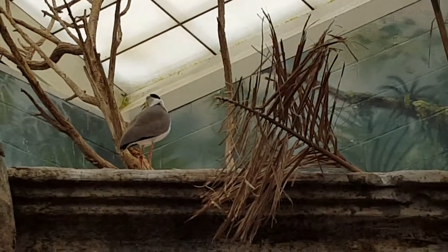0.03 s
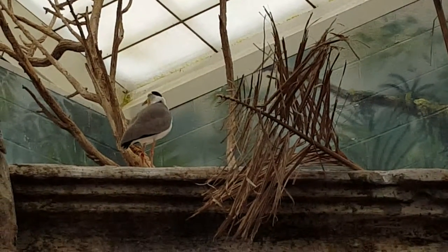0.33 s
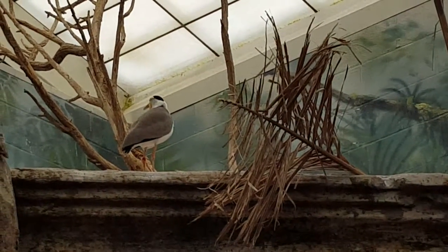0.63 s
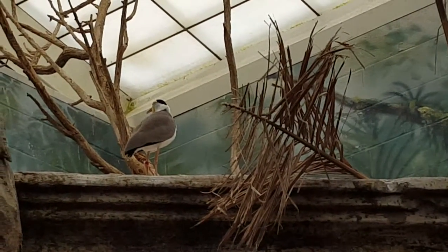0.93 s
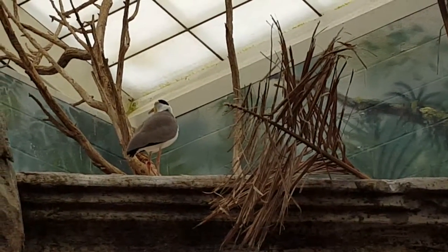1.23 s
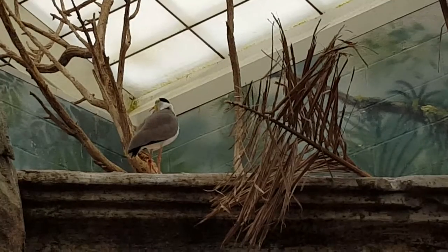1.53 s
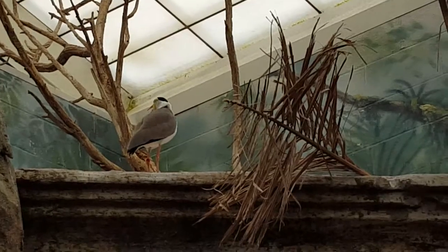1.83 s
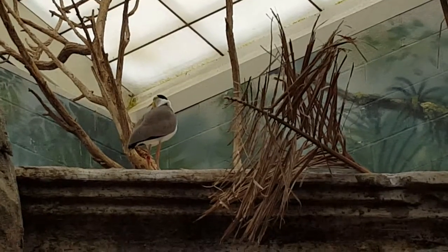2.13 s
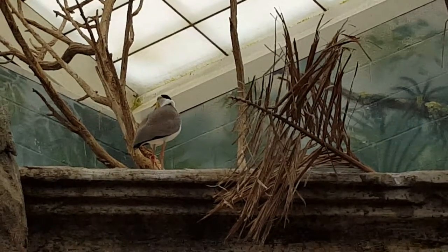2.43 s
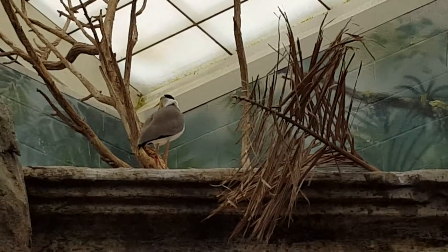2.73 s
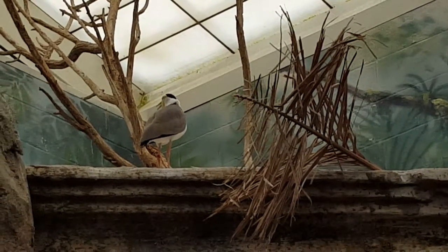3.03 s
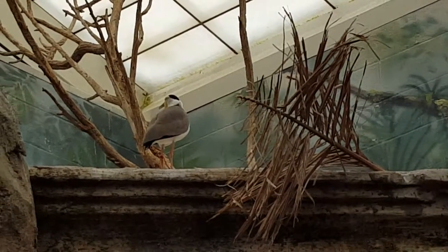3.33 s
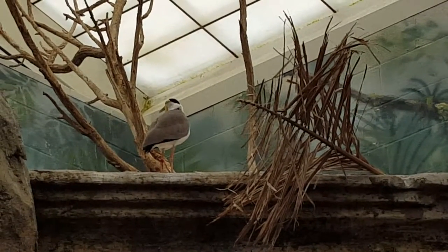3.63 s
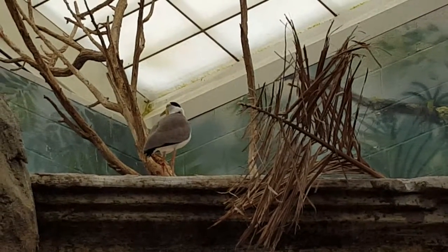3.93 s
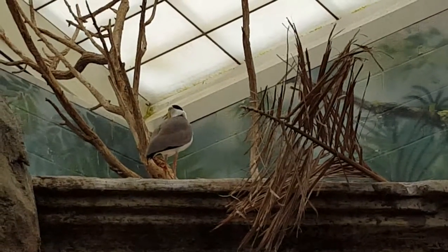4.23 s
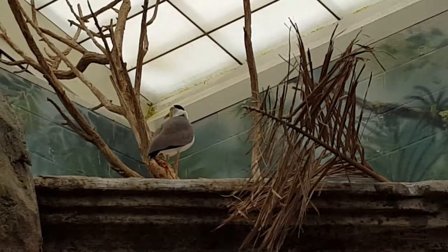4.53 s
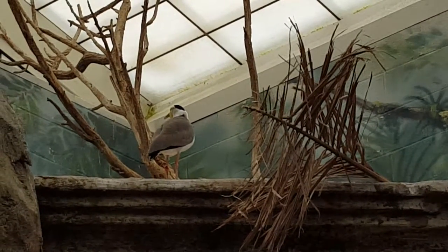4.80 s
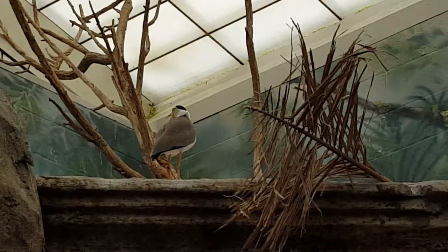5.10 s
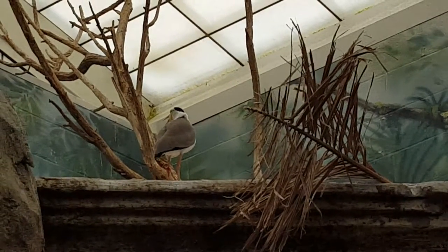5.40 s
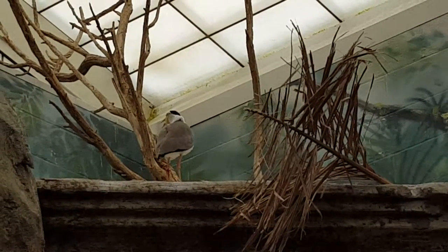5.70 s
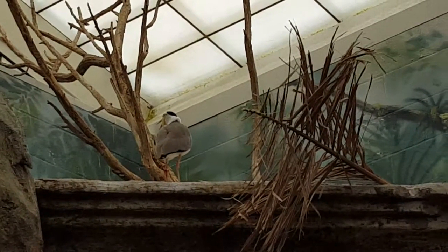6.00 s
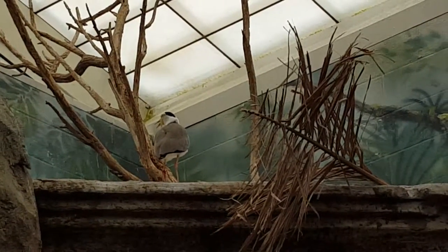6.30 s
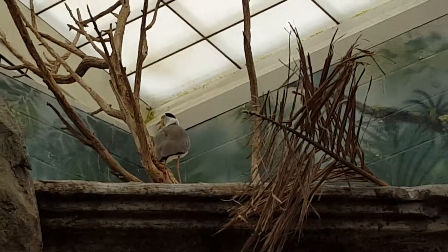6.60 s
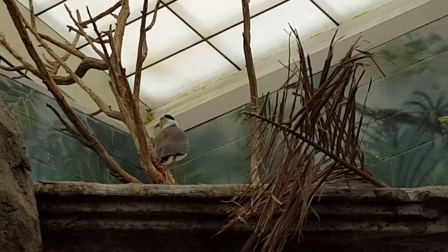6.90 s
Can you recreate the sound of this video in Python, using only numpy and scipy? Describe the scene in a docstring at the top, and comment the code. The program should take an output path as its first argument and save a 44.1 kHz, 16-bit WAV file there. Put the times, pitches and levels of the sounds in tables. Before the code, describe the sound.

Two birds scream in a large, echoing indoor enclosure, heard from some distance over a steady low ventilation rumble. From the start, a hoarse bird repeats short, rough, high screams about five times a second, continuing until about 3.1 seconds. A second bird, shriller and more clipped, calls at the very beginning, then joins with its own rapid run from about 1.5 to 3 seconds. After a brief pause, the hoarse bird resumes from 3.4 to 4.7 seconds, with a single shrill call overlapping near 4.2. The shrill bird starts again at about 5 seconds, the hoarse one follows at 5.3, and both scream together until around 6.7 seconds. Thin, high squeaks slip in between 1.3 and 2.5 seconds and again between 5.3 and 6, the clearest near 5.3. Reverberation smears the calls together and fills the short gaps.

```python
"""Lapwings in a glass-roofed hall

Two lapwings scream in quick series over the drone of a large hall's ventilation. Each scream is a
rough harmonic voice that stutters, swoops up and holds. The other side of the syrinx adds a second
tone; the two mix into sum and difference tones. One bird is hoarse, the other shriller and shorter."""
import sys
import numpy as np
from scipy import signal
from scipy.fft import rfft, irfft
from scipy.io import wavfile

SR = 44100
rng = np.random.default_rng(int(sys.argv[2]) if len(sys.argv) > 2 else 0)


def persist_wave(psi):
    """Save psi, clipped to +-1, as 16-bit WAV."""
    counts = np.round(np.clip(psi, -1, 1) * 32767).astype(np.int16)
    wavfile.write(sys.argv[1], SR, np.atleast_2d(counts).T)


N = 306495
LEAD_IN = SR // 2  # hall already rings at t = 0
USUAL_EFFORT_DB, PITCH_SCATTER, PITCH_JITTER = -19, 0.007, 0.005

# ventilation noise shape: f/Hz, density/dB
AIR_SPECTRUM = [(20, -29), (33, -9), (48, -7), (65, 2), (130, 1.5), (160, -6), (240, -2), (300, -6.5),
                (550, -5), (780, -8), (1200, -7.5), (2500, -13), (6000, -34), (15000, -42)]
# duct and fan resonances: f/Hz, width/Hz, level/dB
DUCT_MODES = [(81, 15, -35.5), (114.9, 14.4, -38.5), (223.2, 14.5, -47), (486.3, 12, -47),
              (604.5, 18, -45.5)]
# ventilation: f/Hz, left-right correlation
AIR_CORRELATION = [(30, 0.97), (120, 1), (250, 0.95), (500, 0.71), (1000, 0.47), (4000, 0.041)]
# hall decay: f/Hz, T60/s
HALL_DECAY = [(250, 5.4), (1200, 1.46), (2100, 1.83), (3500, 1.06), (5600, 1.31), (8000, 0.65),
              (14000, 0.66)]
# microphone colour: f/Hz, left minus right/dB
MIC_BALANCE = [(60, 2.5), (92, -0.5), (140, 1.5), (210, 1.5), (330, 0), (500, 1.5), (770, 1.5), (1170, 0.5),
               (1790, 6), (2740, 1), (4190, -1.5), (6410, -1), (9810, 8.5), (15000, 1.5)]
# thin whistles: t/s, f/Hz, level/dB
BREAK_WHISTLES = [(1.33, 4270, -31), (1.345, 9830, -39), (1.426, 4238, -28), (1.619, 10620, -37),
                  (1.919, 9900, -40), (2.105, 11470, -32), (2.29, 11600, -32), (2.455, 11450, -32),
                  (5.308, 4370, -19.5), (5.379, 11520, -30), (5.56, 11600, -31), (5.91, 11500, -33)]
# toneless screeches: t/s, length/s, f/Hz, width/Hz, level/dB
BREAK_SCREECHES = [(-.08, 0.37, 2900, 804, -30.5), (.24, .14, 2680, 800, -33)]
# breath noise in the throat: f/Hz, density/dB
RASP_SPECTRUM = [(500, -33), (1250, 0), (1650, -0.5), (2100, 2.5), (2800, -6), (3400, -4.5), (4100, -5),
                 (4500, 7.5), (4950, -9), (6200, -10), (7900, -12.5), (10000, -11), (13000, -30.5),
                 (15500, -22)]
# main voice, harmonics 1, 2, 3 ..: relative level/dB
HOARSE_VOICE_DB = [-34, -16, 0.5, -25, -23, -11.5, -20, -29, -40, -32, -27, -32]
SHRILL_VOICE_DB = [-15.5, -7, -1, -10, -27, -7, -41, -19.5, -21.5, -30, -26, -24]
# mixing tones: multiple of main voice, multiple of second tone
MIX_ORDERS = [(0, 1), (3, 1), (6, 1), (0, 2), (3, 2), (3, -1), (6, 2), (9, 1)]
# per mixing tone: relative level/dB
HOARSE_MIX_DB = [-3.5, -10, -19.5, -20.5, -20, -23.5, -46, -45]
SHRILL_MIX_DB = [0.5, -11, -14.5, -20, -16, -14.5, -21, -27]
# shrill bird: t/s, effort/dB, f/Hz
SHRILL_SCREAMS = [ (-.065, -22.5, 1189), (.115, -31, 1174), (1.305, -32, 1145), (1.595, -23, 1165),
                  (1.863, -19.5, 1185), (2.05, -20, 1178), (2.231, -21.5, 1174), (2.405, -22, 1187),
                  (2.585, -22, 1185), (2.779, -20, 1183), (2.964, -19, 1168), (4.25, -23, 1190),
                  (4.95, -21.5, 1194), (5.15, -21.5, 1212), (5.33, -23, 1198), (5.514, -20.5, 1187),
                  (5.699, -18.5, 1183), (5.885, -21.5, 1192), (6.078, -20, 1183), (6.259, -21, 1188),
                  (6.449, -19.5, 1210), (6.648, -22.5, 1199)]
# hoarse bird, three bouts, about 5 screams/s: t/s, effort/dB
HOARSE_SCREAMS = [ (-.295, -18), (-.105, -13), (.08, -17.5), (.268, -19.5), (.464, -18), (.666, -19),
                  (.874, -19), (1.075, -18), (1.275, -19.5), (1.472, -19), (1.678, -18), (1.866, -21.5),
                  (2.058, -21.5), (2.258, -19.5), (2.446, -20.5), (2.655, -20), (2.856, -19), (3.052, -21),
                  (3.438, -18.5), (3.632, -19), (3.82, -18), (4.018, -18.5), (4.219, -15), (4.423, -18.5),
                  (4.623, -19.5), (5.28, -19), (5.505, -17.5), (5.699, -18), (5.881, -17.5), (6.065, -19),
                  (6.268, -18), (6.483, -17.5)]
# drift of its second tone: t/s, f/Hz, relative level/dB
HOARSE_SECOND_DRIFT = [(0, 2079, 0.55), (.9, 2064, 3.8), (2.2, 2082, 2.6), (3.4, 2071, 1.05),
                       (4.7, 2111, 1.3), (5.28, 2032, 2), (5.5, 2085, 1.7), (6.5, 2072, .5)]


def gain_of(db):
    """dB to amplitude."""
    return 10 ** (np.asarray(db) / 20)


def unit_rms(x):
    """Scale to rms 1."""
    return x / np.sqrt(np.mean(x ** 2) + 1e-20)


def log_interp(points, hz):
    """Interpolate (f/Hz, value) points over log frequency."""
    points_hz, values = np.transpose(points)
    return np.interp(np.log(hz + 1), np.log(points_hz + 1), values)


def coloured(x, points):
    """Filter by (f/Hz, gain/dB) points."""
    hz = np.fft.rfftfreq(len(x), 1 / SR)
    return irfft(rfft(x) * gain_of(log_interp(points, hz)), len(x))


def noise_band(size, centre_hz, width_hz):
    """Noise in one broad resonance, rms 1."""
    hz = np.fft.rfftfreq(size, 1 / SR)
    detuning = 2 * (hz - centre_hz) / width_hz
    return unit_rms(irfft(rfft(rng.standard_normal(size)) / (1 + detuning ** 4), size))


def wobble(size, rate_hz):
    """Random motion up to about rate_hz, rms 1."""
    return noise_band(size, centre_hz=0, width_hz=2 * rate_hz)


def add(track, start_s, sound):
    """Mix into a track that starts LEAD_IN samples before t = 0."""
    part = track[max(0, LEAD_IN + round(start_s * SR)):][:len(sound)]
    part += sound[:len(part)]


def ventilation(air_db):
    """Moving air with droning duct and fan resonances; bass alike at both ears."""
    hz = np.fft.rfftfreq(N, 1 / SR)
    air = gain_of(log_interp(AIR_SPECTRUM, hz)) ** 2
    power = gain_of(air_db) ** 2 * air / air.mean()
    for centre_hz, width_hz, db in DUCT_MODES:
        peak = 1 / (1 + (2 * (hz - centre_hz) / width_hz) ** 2) ** 2
        power += gain_of(db) ** 2 * peak / peak.mean()
    left, independent = rfft(rng.standard_normal((2, N)))
    correlation = log_interp(AIR_CORRELATION, hz)
    right = correlation * left + np.sqrt(1 - correlation ** 2) * independent
    return irfft(np.array([left, right]) * np.sqrt(power), N)


def hall(x, direct_db, early_db, early_s, tail_db):
    """Direct sound, near-wall reflections and a long tail that loses treble first."""
    noise = rng.standard_normal((2, 3 * SR // 2))
    hz, t, spectra = signal.stft(noise, SR, nperseg=256)
    decay = gain_of(-60 * t / log_interp(HALL_DECAY, hz)[:, None])
    build_up = 1 - np.exp(-t / 0.0028)
    _, tail = signal.istft(spectra * decay * build_up, SR, nperseg=256)
    response = gain_of(tail_db) * tail / np.linalg.norm(tail[0])
    for ear in response:
        lags = rng.random(size=14)
        echoes = rng.choice([-1, 1], size=14) * np.exp(-lags)
        echoes *= gain_of(early_db) / np.linalg.norm(echoes)
        np.add.at(ear, (lags * early_s * SR).astype(int), echoes)
    response[:, 0] += gain_of(direct_db)
    return signal.fftconvolve(x[None], response, axes=1)[:, LEAD_IN:LEAD_IN + N]


def voice_breaks(whistle_s=0.049):
    """A voice cracks into thin, falling whistles or toneless screeches."""
    track = np.zeros(LEAD_IN + N)
    t = np.arange(SR // 2) / SR
    for start_s, hz, db in BREAK_WHISTLES:
        progress = np.minimum(t / whistle_s, 1)
        bend = 1 - 0.02 * (progress - 0.5) + 0.008 * wobble(len(t), rate_hz=250)
        tone = np.sin(2 * np.pi * np.cumsum(hz * bend) / SR)
        add(track, start_s, gain_of(db) * unit_rms(tone) * np.sin(np.pi * progress))
    for start_s, length_s, hz, width_hz, db in BREAK_SCREECHES:
        envelope = np.sin(np.pi * np.minimum(t / length_s, 1))
        add(track, start_s, gain_of(db) * noise_band(len(t), hz, width_hz) * envelope)
    return track


def scream(length_s, pitch_hz, second_hz, harmonics_db, mix_db, second_db, tilt_db_per_oct,
           swoop, swoop_s, sag, rough_rad, onset_rough_rad, rough_hz,
           flutter, stutter, stutter_hz, swell_s, crest_db, rasp_db, chip_db):
    """Both sides of the syrinx stutter into motion, settle on pitch and modulate each other."""
    size = SR // 5
    t = np.arange(size) / SR
    contour = 1 - swoop * np.exp(-t / swoop_s) - sag * np.minimum(t / length_s, 1) ** 6
    jitter = 1 + PITCH_JITTER * np.array([wobble(size, rate_hz=136) for _ in range(2)])
    main_phase = 2 * np.pi * np.cumsum(pitch_hz * contour * jitter[0]) / SR
    second_phase = 2 * np.pi * np.cumsum(second_hz * contour * jitter[1]) / SR
    partials = [(k, 0, db) for k, db in enumerate(harmonics_db, start=1)]
    partials += [(k, m, db + second_db) for (k, m), db in zip(MIX_ORDERS, mix_db)]
    roughness = rough_rad + onset_rough_rad * np.exp(-(t / 0.072) ** 2)
    swell = 1 - np.exp(-t / swell_s)
    voice = np.zeros(size)
    for k, m, db in partials:
        height = (k * pitch_hz + m * second_hz) / 3000
        bloom = swell ** (height ** 0.43)  # upper partials rise last
        shimmer = unit_rms(gain_of(3.87 * wobble(size, rate_hz=39)))
        phase_noise = roughness * min(height, 1) * wobble(size, rough_hz)  # hoarse sidebands
        tone = np.cos(k * main_phase + m * second_phase + phase_noise)
        voice += gain_of(db + tilt_db_per_oct * np.log2(height)) * bloom * shimmer * tone
    chip = gain_of(chip_db) * np.exp(-t / 0.0093) * noise_band(size, centre_hz=2690, width_hz=330)
    airflow = np.sin(np.pi / 2 * np.minimum(t / 0.025, 1))
    rasp = gain_of(rasp_db) * airflow * unit_rms(coloured(rng.standard_normal(size), RASP_SPECTRUM))
    crest = np.exp(-((t / length_s - 0.62) / 0.32) ** 2)  # push swells or eases past mid-call
    gate = np.clip(t / 0.011, 0, 1) * np.clip((length_s - t) / 0.012, 0, 1)
    pressure = gain_of(crest_db * (crest - 0.6368)) * gate
    pulsing = 1 + stutter * np.exp(-(t / 0.064) ** 4) * np.sin(2 * np.pi * stutter_hz * t)
    flicker = unit_rms(np.exp(flutter * wobble(size, rate_hz=92)))
    return pressure * pulsing * flicker * (voice + rasp + chip)


def shrill_bird(second_ratio=1.93):
    """Short screams, shorter when pushed; second tone just under the octave."""
    track = np.zeros(LEAD_IN + N)
    for start_s, effort_db, pitch_hz in SHRILL_SCREAMS:
        length_s = min(0.0776 - 0.05 * (effort_db - USUAL_EFFORT_DB), 0.096)
        second_hz = second_ratio * pitch_hz * (1 + PITCH_SCATTER * rng.standard_normal())
        call = scream(length_s, pitch_hz, second_hz, SHRILL_VOICE_DB, SHRILL_MIX_DB, second_db=0.6,
                      tilt_db_per_oct=0, swoop=0.12, swoop_s=0.015, sag=0.026,
                      rough_rad=0.6, onset_rough_rad=0.36, rough_hz=190,
                      flutter=0.23, stutter=0.69, stutter_hz=50.6,
                      swell_s=0.017, crest_db=-5.5, rasp_db=-10, chip_db=-29)
        add(track, start_s, gain_of(effort_db) * call)
    return track


def hoarse_bird(mean_pitch_hz=1161.3):
    """Two-toned screams; a harder push spends the air sooner and favours the main voice."""
    track = np.zeros(LEAD_IN + N)
    drift_s, drift_hz, drift_db = np.transpose(HOARSE_SECOND_DRIFT)
    for start_s, effort_db in HOARSE_SCREAMS:
        extra_db = effort_db - USUAL_EFFORT_DB
        length_s = 0.1073 - 0.005 * extra_db
        pitch_hz = mean_pitch_hz * (1 + PITCH_SCATTER * rng.standard_normal())
        second_hz = np.interp(start_s, drift_s, drift_hz)
        second_db = np.interp(start_s, drift_s, drift_db) - 0.52 * extra_db
        call = scream(length_s, pitch_hz, second_hz, HOARSE_VOICE_DB, HOARSE_MIX_DB, second_db,
                      tilt_db_per_oct=0.8, swoop=0.0688, swoop_s=0.00715, sag=0.0035,
                      rough_rad=0.32, onset_rough_rad=0.52, rough_hz=242,
                      flutter=0.34, stutter=0.61, stutter_hz=41.4,
                      swell_s=0.0011, crest_db=1.5, rasp_db=-8.5, chip_db=-4)
        add(track, start_s, gain_of(effort_db) * call)
    return track


def scene():
    """Both birds in the hall, over the ventilation."""
    hoarse, shrill = hoarse_bird(), shrill_bird()
    birds = hall(hoarse + voice_breaks(), direct_db=-12, early_db=-4, early_s=0.02, tail_db=-2)
    birds += hall(shrill, direct_db=-7, early_db=-3, early_s=0.025, tail_db=-1.5)
    return birds + ventilation(air_db=-32)


def record(dry):
    """Two microphones of unequal colour, then a low-pass."""
    left = coloured(dry[0], [(hz, db / 2) for hz, db in MIC_BALANCE])
    right = coloured(dry[1], [(hz, -db / 2) for hz, db in MIC_BALANCE])
    lowpass = signal.firwin(511, cutoff=15500, window=("kaiser", 9), fs=SR)
    return signal.oaconvolve(np.array([left, right]), lowpass[None], "same")


dry = scene()
out = record(dry)
persist_wave(out)
```